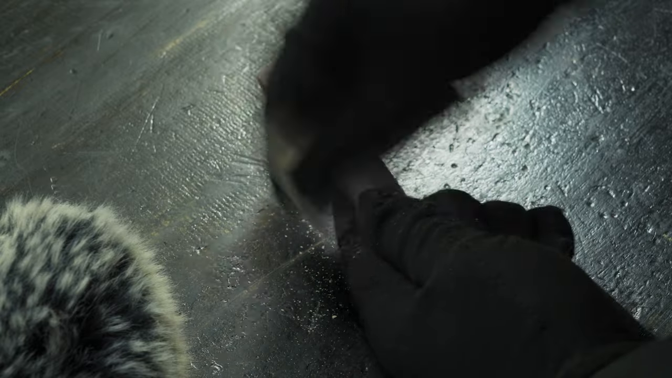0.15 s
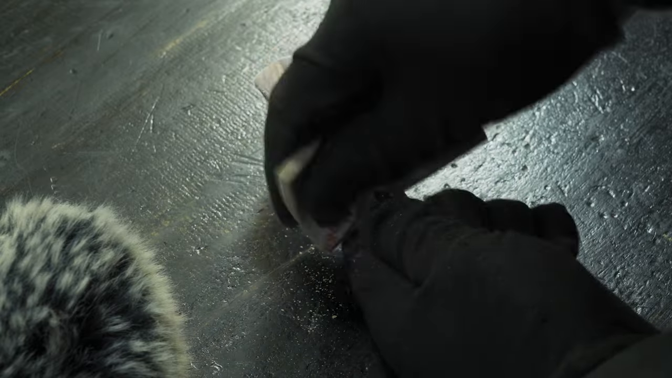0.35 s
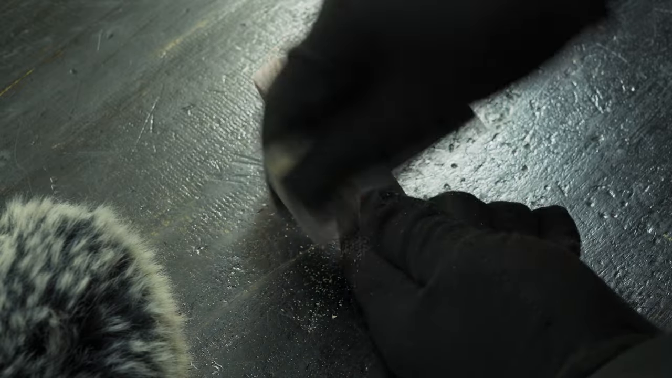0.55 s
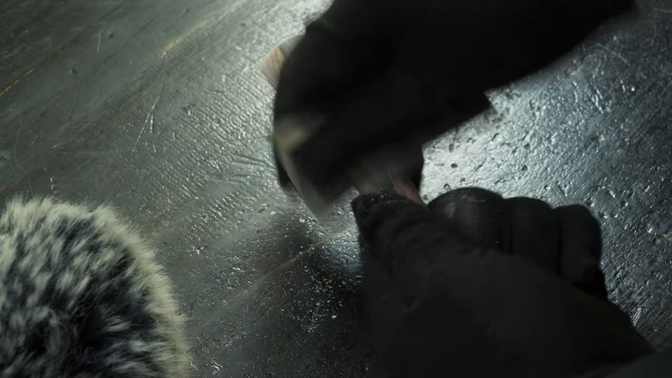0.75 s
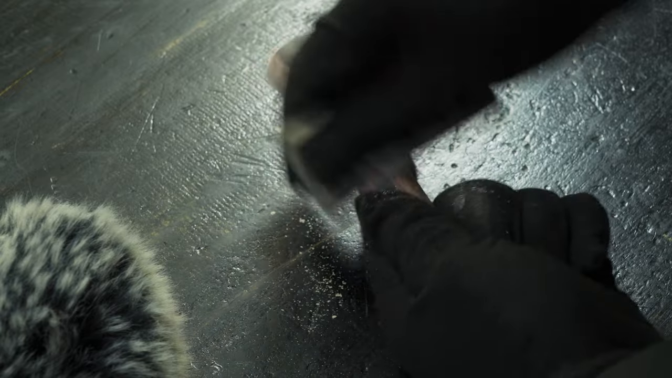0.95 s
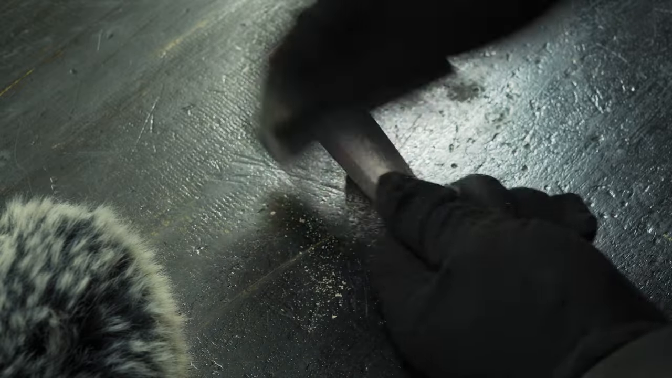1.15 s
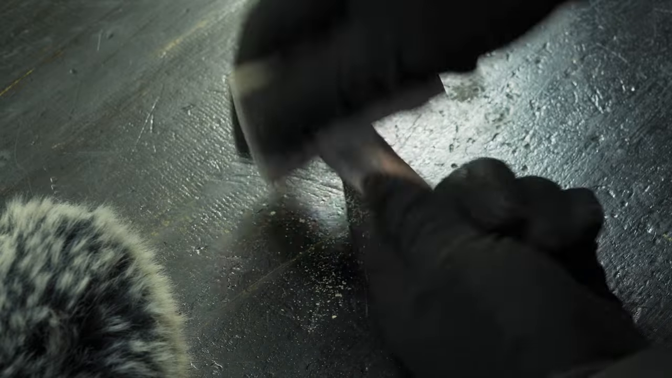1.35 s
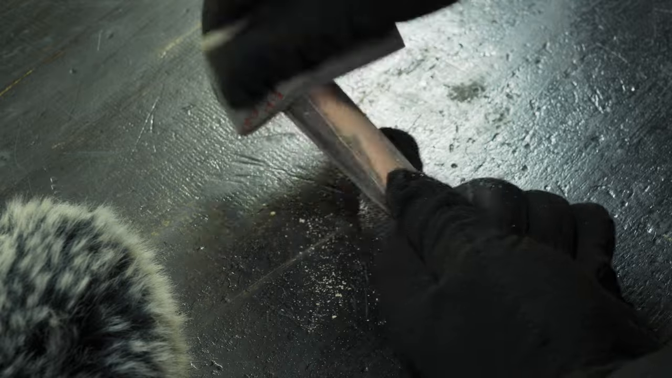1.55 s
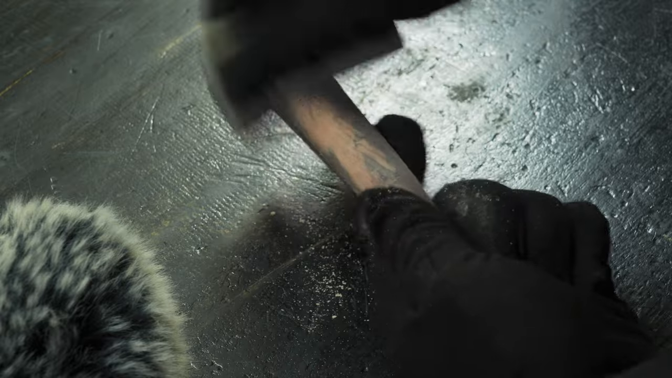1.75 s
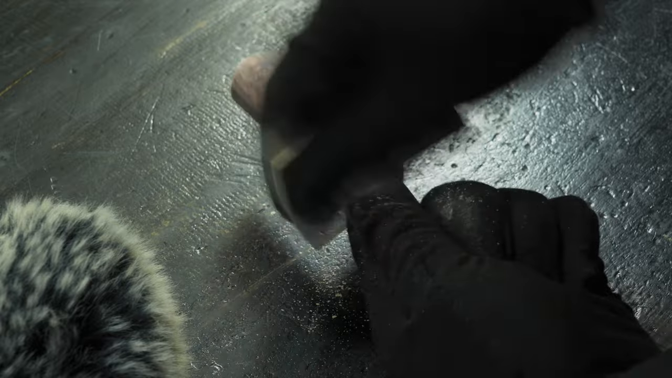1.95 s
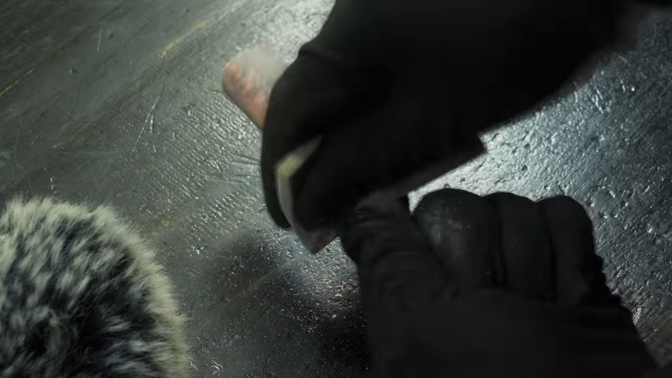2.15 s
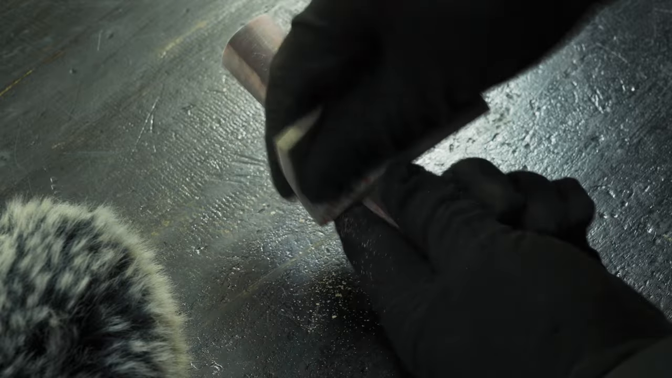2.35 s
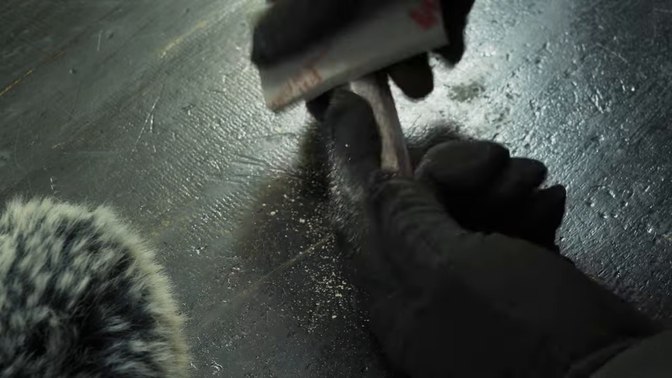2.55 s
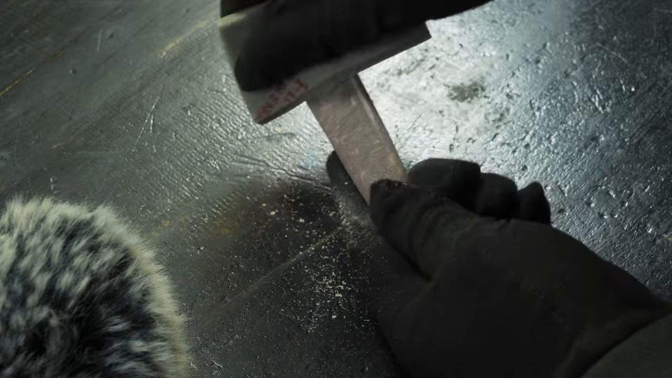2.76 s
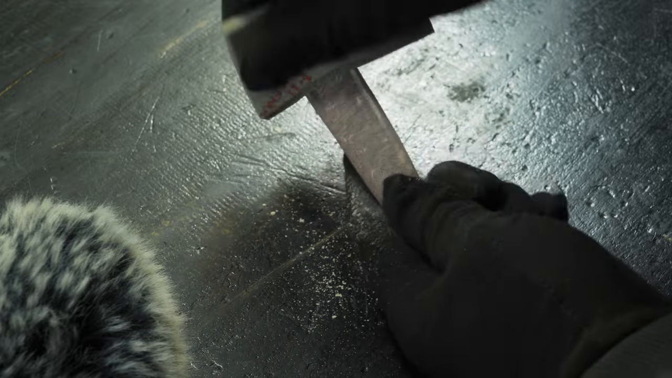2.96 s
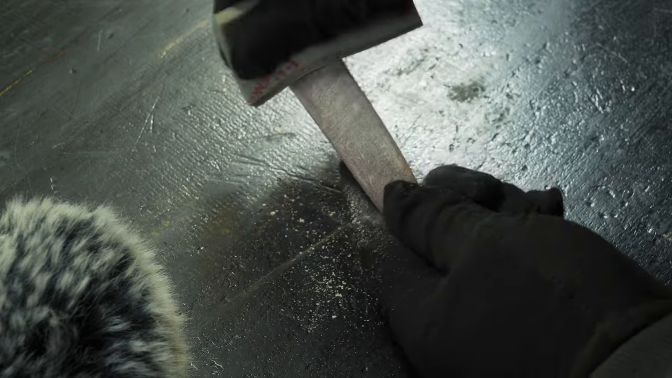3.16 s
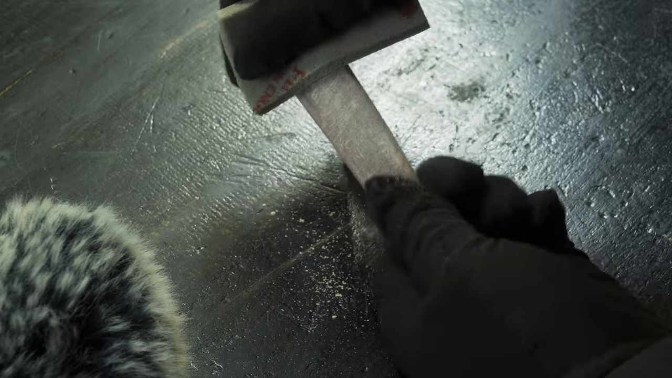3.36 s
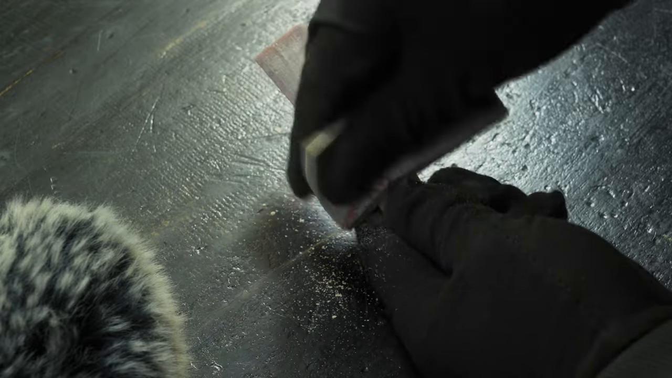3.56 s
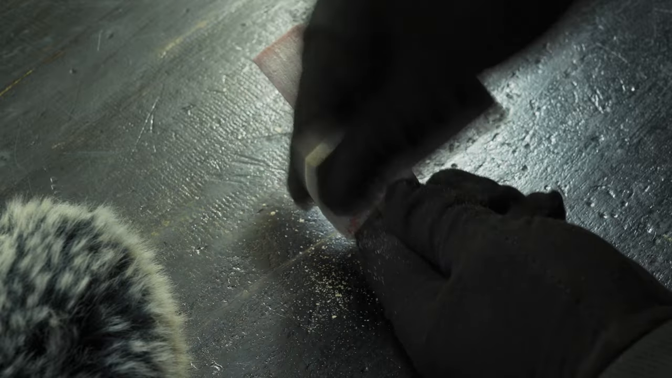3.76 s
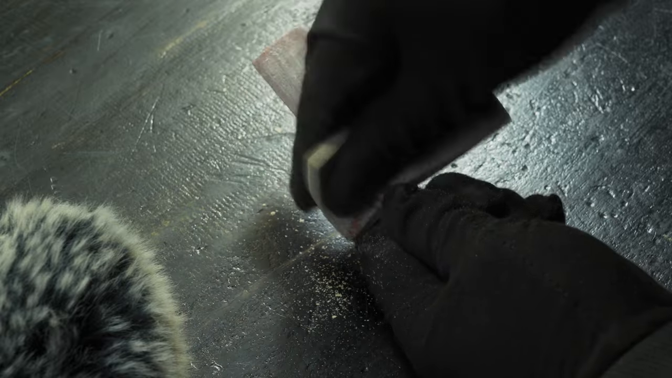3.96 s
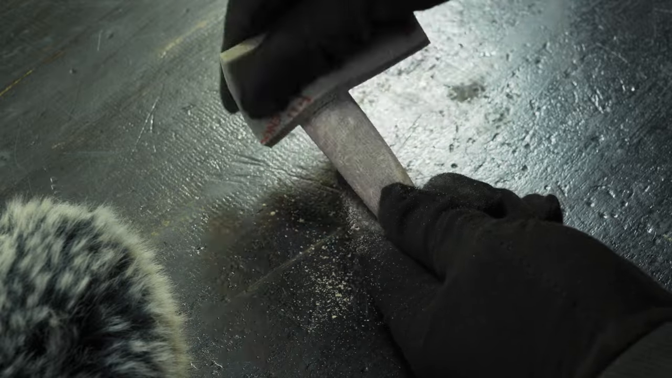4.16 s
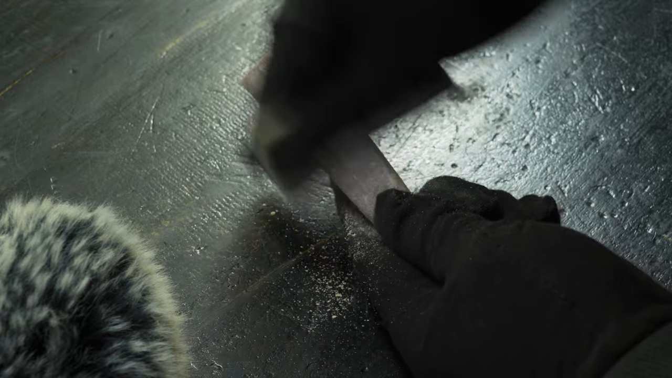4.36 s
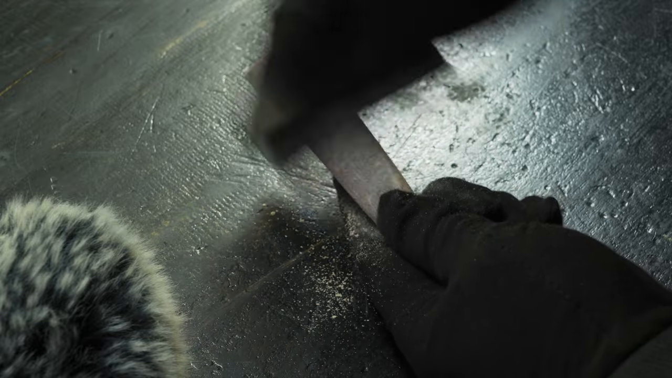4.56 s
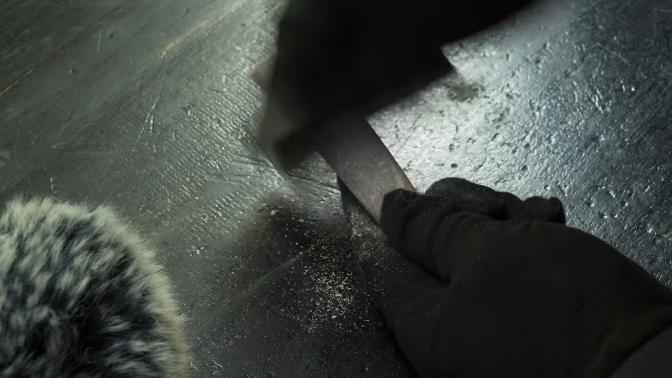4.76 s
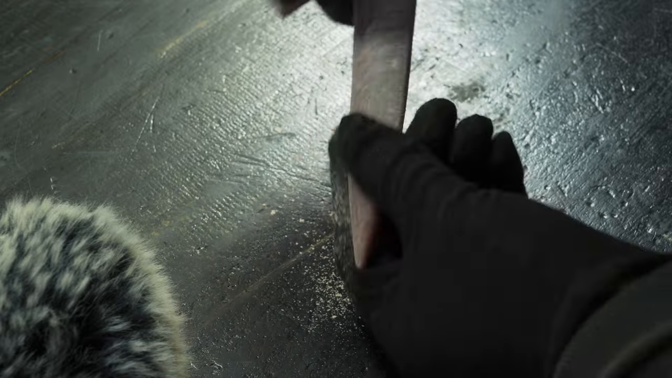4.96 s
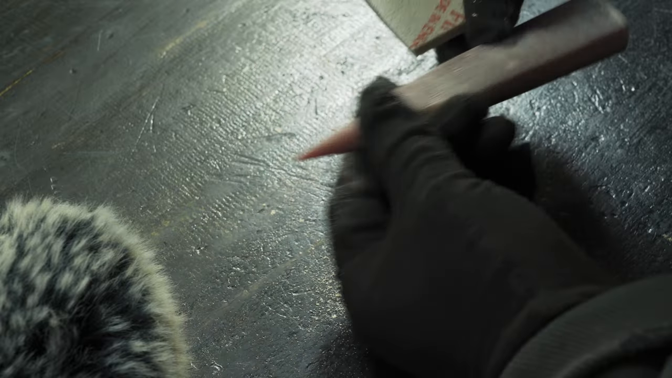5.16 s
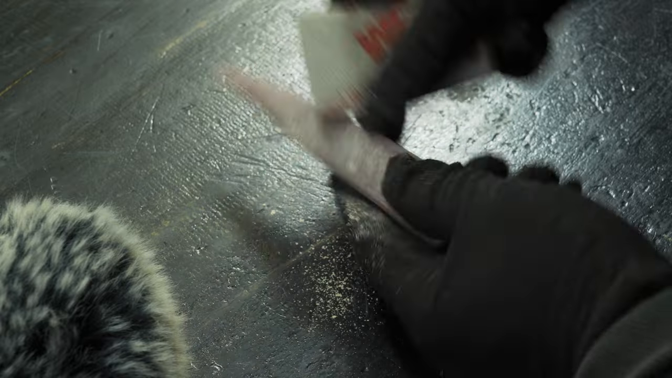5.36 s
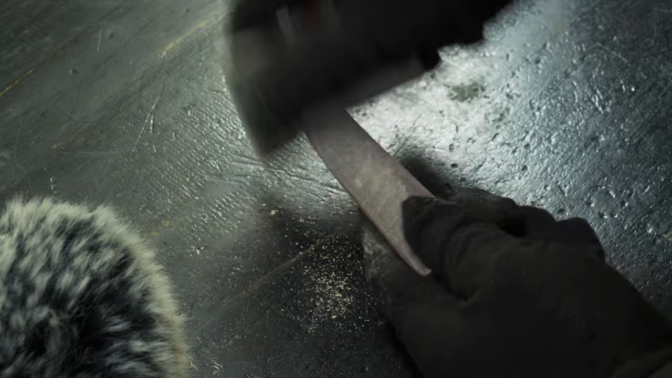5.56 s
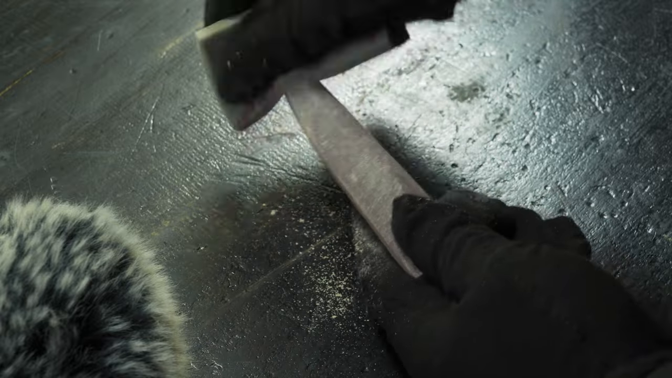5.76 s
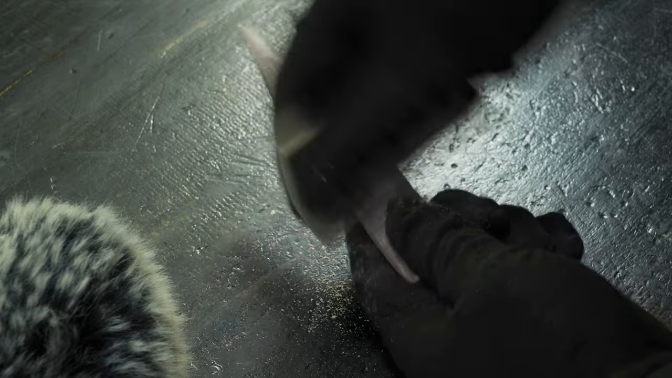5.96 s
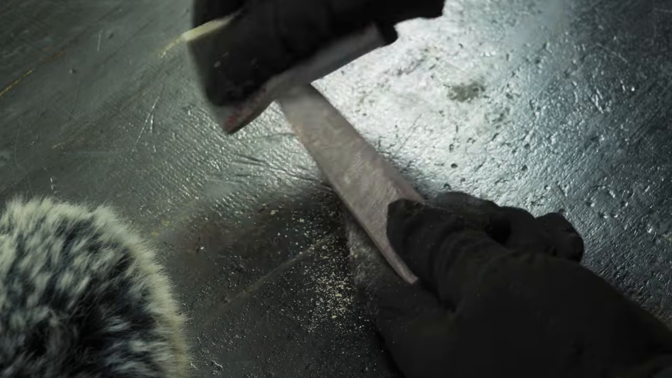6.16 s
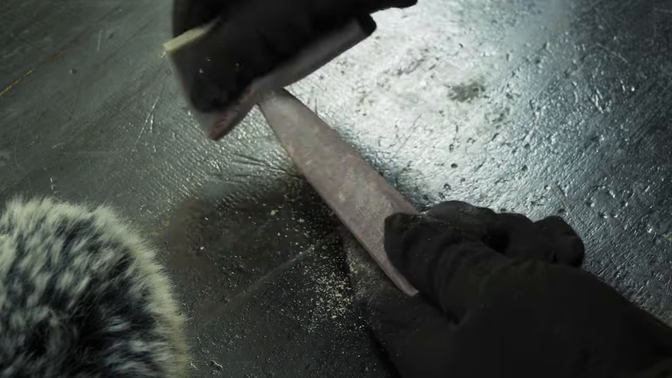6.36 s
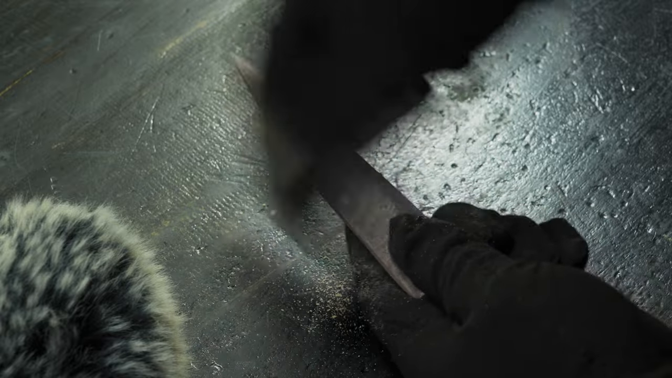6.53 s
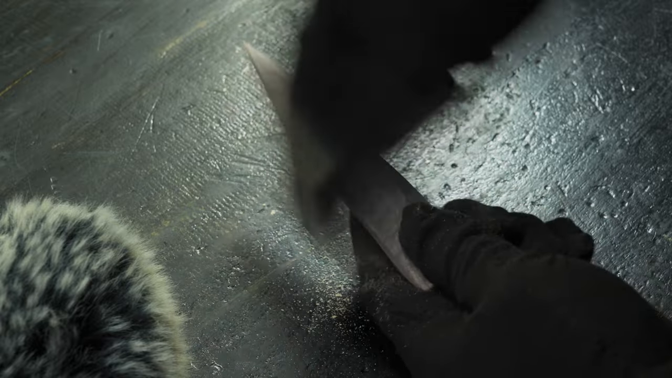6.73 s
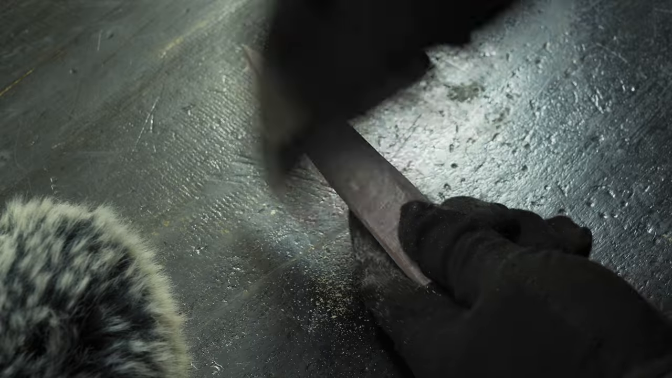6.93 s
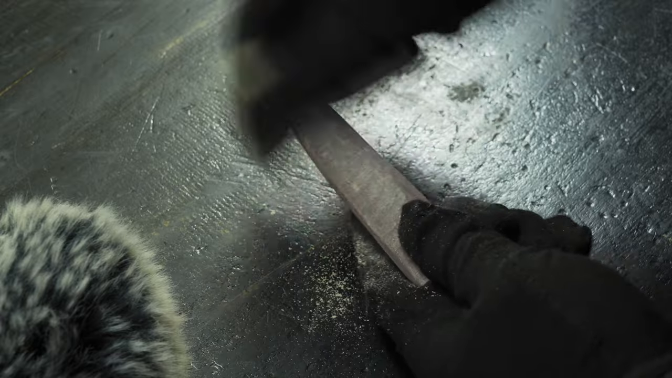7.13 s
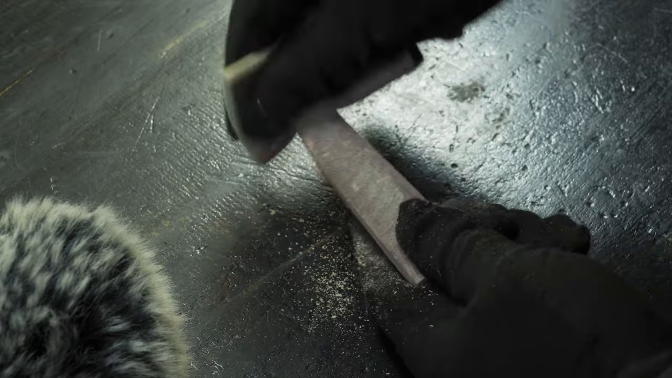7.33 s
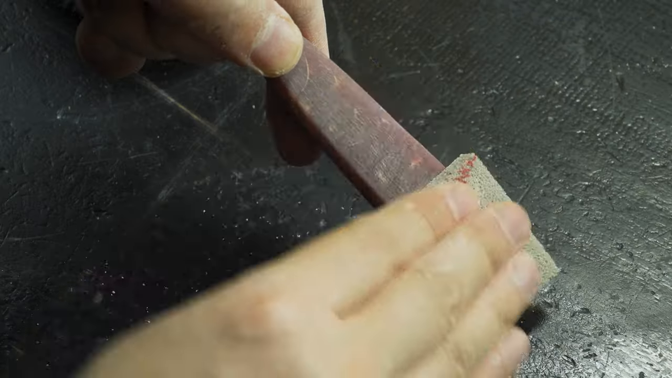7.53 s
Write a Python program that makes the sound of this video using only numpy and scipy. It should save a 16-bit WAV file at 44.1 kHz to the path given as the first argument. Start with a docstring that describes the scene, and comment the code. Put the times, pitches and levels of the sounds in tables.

```python
"""Sanding a stick of dried fish

Close microphone at a table in a small, damped room, with the work off to the right. A sanding pad is
rubbed fast to and fro over a rock-hard stick of dried fish. Each stroke is a burst of grit scratches;
the stick knocks and rings as the pad turns, grit snags, and dull thuds pass through the hand into the
table. Between runs, gloved hands turn the stick over with a rustle, a few ticks and a tap."""
import sys
import numpy as np
from scipy import signal
from scipy.fft import rfft, irfft, next_fast_len
from scipy.io import wavfile
from scipy.ndimage import uniform_filter1d

SR = 44100
rng = np.random.default_rng(int(sys.argv[2]) if len(sys.argv) > 2 else 0)


def put_to_file(sound):
    """Save the sound as 16-bit audio at rate SR, in the file named by the first command-line argument."""
    columns = np.atleast_2d(sound).T  # one column per channel
    safe = np.clip(columns, -1, 1)
    whole_steps = np.round(safe * 32767)
    wavfile.write(sys.argv[1], SR, whole_steps.astype(np.int16))


N = 334719
TIME = np.arange(N) / SR

# Spectrum of the room air: frequency_hz, gain_db
AIR_SPECTRUM = [(28, -6), (55, -20), (120, -15), (150, -6), (230, -11), (420, -2), (800, -2.5), (1020, 2.5),
                (1400, -6.5), (4000, -13.5), (9000, -20.5), (16000, -25)]
# Runs of to-and-fro sanding: start_s, stroke_count, cycle_s, slowing_s (per cycle), startup_lag_s
SANDING_RUNS = [(0.031, 26, .0947, .00034, .0045), (1.56, 8, .094, 0, 0), (2.024, 10, .097, 0, 0),
                (3.067, 6, .095, 0, .009), (3.507, 14, .0995, 0, .014), (4.299, 12, .0978, 0, 0),
                (5.645, 6, .102, 0, .008), (6.026, 4, .102, 0, .001), (6.336, 2, .102, 0, 0),
                (6.507, 21, .0973, .00096, .001)]
# How the pad meets the stick in each run (swell: rise over a stroke, bite: low rasp, sheen: treble):
# level_db, push_swell_db, pull_swell_db, push_bite_db, pull_bite_db, push_sheen_db, pull_sheen_db,
# push_start_knock_db, push_stop_knock_db
PAD_CONTACT = [(-45, 1.5, -8, 0.07, -0.3, -1, 0.7, -68, -57.5),
               (-48, -2, -7.5, 0.7, 0.4, 0.5, 2.5, -67.5, -62),
               (-48, 6, -1, -0.5, -0.5, -1.3, 1, -79, -57.5),
               (-46.5, -1.5, -1, 0, -0.17, -1, 1.2, -66, -50.5), (-46.5, 3, -1, 0.5, 0, 0, 1.5, -53, -53.5),
               (-46.5, 3.5, -0.5, 0.3, -0.3, -2.6, 0.7, -50, -51.5),
               (-43, -1.5, -2.5, 1.35, -1.3, 6, 2.5, -56, -59),
               (-44.5, -0.5, -7, 1, -0.3, 3.5, 1, -51, -70), (-44.5, 4, 5, 0.5, 0, 0.5, 1.5, -59, -61),
               (-45.5, -1, -2.5, -0.98, -2, 3.5, 3.6, -46, -48.5)]
# Hand pressure, on top of each run's level: time_s, gain_db
HAND_PRESSURE = [(0.04, 3), (0.6, -0.96), (0.74, -1), (0.88, -3), (1.02, -5.5), (1.1, -1.5), (1.22, -1),
                 (1.7, -1), (1.85, -5.5), (2.04, -3), (2.21, -3), (2.3, -2.6), (2.48, -3), (3.08, 4.5),
                 (3.33, 2.5), (3.7, 2), (6.4, -0.5), (6.52, 1.5), (6.659, 2.5), (7.3, 1.3)]
# Strokes outside the rhythm: start_s, end_s, direction (push 1, pull -1), level_db, swell_db, bite_db,
# sheen_db
SINGLE_STROKES = [(1.343, 1.358, 1, -54.5, -1, -0.5, -9), (1.423, 1.473, 1, -57.5, 7.5, -1.5, -6),
                  (1.5, 1.539, -1, -49, 7, -1.5, 0.5), (2.504, 2.535, 1, -47, 10.5, 1.5, -5.5),
                  (2.764, 2.783, 1, -53.5, -6, 7, 3.5), (4.868, 4.882, -1, -40, 20, 0, 4)]
# Spectrum of grit on the stick: frequency_hz, gain_db
RASP_SPECTRUM = [(120, -61), (530, -32.5), (900, -29.5), (1320, -29), (2040, -10.5), (3110, -4), (3820, -5),
                 (4800, 0.5), (5550, -4), (6640, -9.5), (7490, -3), (8870, -7), (11600, -0.5), (13200, -5),
                 (15100, -1.5), (16000, -24)]
# Where light strokes sound hollow: frequency_hz, weight
HOLLOW_SHAPE = [(5200, 0.46), (6400, 1.0), (7500, 0)]
# How sheen tilts the rasp: frequency_hz, weight
SHEEN_SHAPE = [(4500, -0.52), (8000, 0.36), (11000, 0.48), (15000, 0.91)]
# Flare of the rasp on a rough patch near the far end of the pad's travel: time_s, flare_db
ROUGH_PATCH = [(0.05, -1), (0.36, 2), (0.66, 9), (0.98, -10.5), (1.16, 7), (1.55, 8), (2.03, -3.5),
               (2.3, 4), (2.5, 6), (3.1, 3.5), (4.05, 2.5), (4.45, 9), (5.7, -6.5), (7.5, 1)]
# How loosely the stick rocks in the hand: time_s, level_db
ROCKING_LEVEL = [(0, -64), (0.6, -65), (0.88, -72.5), (1.2, -64.5), (1.5, -72), (1.85, -67), (2.4, -68),
                 (2.6, -67.5), (3.3, -79), (3.7, -75), (4.2, -71.5), (5.8, -64.5), (6.3, -70), (6.8, -64.5),
                 (7.55, -65)]
# Spectrum of the rumble in hand and table: frequency_hz, gain_db
RUMBLE_SPECTRUM = [(25, 4.5), (55, -6.5), (110, -2), (160, 2), (220, 3.5), (430, -2), (620, 1), (900, -4.5),
                   (1500, -3.5)]
# Modes of the stick: pitch_hz, level_db, t60_s, muting_db (lost under the pad; negative is a gain)
STICK_MODES = [(437, -1.5, 0.084, 2.5), (511, -4.5, 0.17, 25), (590, 0, 0.061, 18), (1080, -19.5, 0.046, 9),
               (1282, -4, 0.066, 34), (1290, -20, .05, 22), (1870, -34, 0.047, -21)]
# Hard knocks of the stick against its rest: time_s, level_db
HARD_KNOCKS = [(0.715, -40), (0.989, -47.5), (1.729, -46), (2.132, -47.5), (2.344, -48.5), (4.436, -44),
               (4.723, -40), (4.821, -35.5), (5.337, -40.5), (5.355, -50.5), (6.803, -39.5), (7.214, -36.5)]
# Grit snagging or a crumb snapping: time_s, level_db, centre_hz
GRIT_SNAGS = [(0.133, -30, 2040), (0.715, -20, 2630), (1.372, -37, 7000), (2.318, -33.5, 2550),
              (2.861, -45, 9000), (4.881, -26.5, 2300), (5.183, -40.5, 6940), (5.197, -35, 2240),
              (5.543, -34, 5900), (5.619, -36, 5630)]
# Thuds through the holding hand into the table: time_s, peak_db, pitch_hz
TABLE_THUDS = [(0.539, -52.5, 210), (0.718, -51, 293), (1.874, -61.5, 210), (2.153, -62, 220),
               (2.219, -56, 221), (2.254, -56, 220), (2.348, -55, 220), (2.429, -54, 216),
               (4.885, -34, 300), (5.185, -45, 305), (5.198, -31, 670)]
# Gloves and pad sliding as the grip changes: start_s, end_s, level_db, tilt_db_per_octave
GLOVE_SLIDES = [(1.277, 1.341, -64.5, 8), (2.541, 2.614, -55.5, 4), (2.608, 2.654, -61.5, 9.5),
                (2.642, 2.713, -75, 0), (2.883, 2.912, -61, 0.5), (2.985, 3.07, -69, 3.5),
                (4.881, 4.962, -57, 4), (5.29, 5.321, -62, -2), (5.413, 5.657, -64.5, 6),
                (5.481, 5.6, -65, 2)]
# Spectrum of the glove rustle: frequency_hz, gain_db
GLOVE_SPECTRUM = [(120, -47), (500, -3), (1300, 1.5), (3000, -2.5), (5000, 1), (6500, -6.5), (11300, -6.5),
                  (16000, -22.5)]


def from_db(db):
    return 10 ** (np.asarray(db) / 20)


def unit_rms(x):
    return x / np.sqrt(np.mean(x ** 2) + 1e-20)


def add(out, time_s, sound):
    """Mix a sound in at a time."""
    at = int(np.clip(round(time_s * SR), 0, N))
    out[at:at + len(sound)] += sound[:N - at]


def at_hz(points, hz):
    """Read a curve on a log-frequency axis."""
    known_hz, values = np.transpose(points)
    return np.interp(np.log(hz + 1), np.log(known_hz), values)


def colour(x, spectrum):
    """Give a sound a spectrum; rms 1."""
    size = next_fast_len(len(x))
    gain = from_db(at_hz(spectrum, np.fft.rfftfreq(size, 1 / SR)))
    return unit_rms(irfft(rfft(x, size) * gain, size)[:len(x)])


def wander(along, step):
    """Random values of spread 1, one every step, joined by lines."""
    return np.interp(along / step, np.arange(4096), rng.standard_normal(4096))


def grit(size, per_s, spread_db):
    """Grains catch at random moments with uneven strength; rms 1."""
    caught = rng.random(size) < per_s / SR
    grains = caught * rng.standard_normal(size)
    return unit_rms(grains * from_db(spread_db * np.minimum(rng.exponential(1, size), 5)))


def ring(drive, hz, t60_s):
    """One mode: a unit click sets off a decaying sine."""
    decay, angle = from_db(-60 / (t60_s * SR)), 2 * np.pi * hz / SR
    return signal.lfilter([0, np.sin(angle)], [1, -2 * decay * np.cos(angle), decay ** 2], drive + 1e-18)


def room_air(level_db=-74):
    """Faint, steady air behind the work."""
    return from_db(level_db) * colour(rng.standard_normal(N), AIR_SPECTRUM)


def sanding_hand(push_s=0.033, turn_s=0.014, pull_s=0.038, jitter_s=0.0005, knock_spread_db=3.5):
    """The hand pushes, turns, pulls and rests; the stick knocks lightly at both ends of each push."""
    strokes, knocks = [], []
    for (begin_s, count, cycle_s, slowing_s, lag_s), contact in zip(SANDING_RUNS, PAD_CONTACT):
        run_db, *tone_db, start_knock_db, stop_knock_db = contact
        for k, chance in enumerate(rng.standard_normal((count, 8))):
            cycle, pulling = divmod(k, 2)
            cycle_start = begin_s + cycle_s * cycle + slowing_s * cycle ** 2 / 2 + lag_s * (cycle > 0)
            wait_s, length_s, direction = (push_s + turn_s, pull_s, -1) if pulling else (0, push_s, 1)
            start, end = cycle_start + wait_s + jitter_s * chance[:2] + [0, length_s]
            pressure_db = np.interp((start + end) / 2, *np.transpose(HAND_PRESSURE))
            level_db = run_db + pressure_db + 0.52 * chance[2]
            swell_db, bite_db, sheen_db = tone_db[pulling::2]
            swell_db += 1.5 * chance[3]
            bite_db += 0.45 * pressure_db + 0.57 * chance[4]   # harder pressure bites deeper
            sheen_db += 1.57 * chance[5]
            if k == 0:   # the first push is lighter and duller
                level_db -= 0.5
                sheen_db -= 2.5
            strokes.append((start, end, direction, level_db, swell_db, bite_db, sheen_db))
            if not pulling:
                knocks.append((start, start_knock_db + knock_spread_db * chance[6]))
                knocks.append((end, stop_knock_db + knock_spread_db * chance[7]))
    return strokes, knocks


def scratch_spectrum(size, heavier_db, ripple_db=2.0):
    """Grit scratches of one stroke: each contact favours other resonances; light ones sound hollow."""
    hz = np.fft.rfftfreq(size, 1 / SR)
    gain = from_db(at_hz(RASP_SPECTRUM, hz) + ripple_db * wander(hz, step=180))
    gain *= from_db(0.86 * heavier_db * at_hz(HOLLOW_SHAPE, hz))
    middle = (hz > 3500) & (hz < 9000)
    gain /= np.sqrt(np.mean(gain ** 2 * middle))
    return rfft(grit(size, per_s=30000, spread_db=-1.4)) * gain


def low_cut_db(hz, edge_hz):
    """The steep lower edge of the rasp."""
    return -10 * np.log10(1 + (edge_hz / hz) ** 8)


def stroke_tone_db(stroke, progress, hz, edge_hz=2300, travel_octaves=0.51, arch_octaves=0.095):
    """The rasp changes colour as the pad travels; progress runs from -0.5 to 0.5."""
    start, _, direction, _, swell_db, bite_db, sheen_db = stroke
    position = direction * progress
    speed = 0.5 - (2 * progress) ** 2
    # the lower edge climbs toward the holding hand, arches with speed and drops as the grit bites
    edge_octaves = travel_octaves * position + arch_octaves * speed - 0.28 * bite_db
    edge_db = low_cut_db(hz, edge_hz * 2 ** edge_octaves) - low_cut_db(hz, edge_hz)
    # brightest where the pad presses hardest, dullest where it slows to turn
    treble = at_hz(SHEEN_SHAPE, hz)
    bright_db = sheen_db + 0.93 * swell_db * progress - 3.5 * (2 * progress) ** 4 + 0.5
    # a push ends on the rough patch and a pull starts on it
    on_patch = np.exp(-((position - 0.315) / 0.12) ** 2)
    flare_db = on_patch * np.interp(start, *np.transpose(ROUGH_PATCH))
    return edge_db + treble * bright_db + (1 + treble) / 2 * flare_db


def sanding(strokes, grab_s=0.0009, release_s=0.001, land_s=0.0014, lift_s=0.0032, rough_db=0.75):
    """The pad drags grit over the stick; returns the rasp and the drag force behind it."""
    rasp, drag = np.zeros(N), np.zeros(N)
    size, lead_s, pause_s = 4096, 0.012, 0.04
    hz, t = np.fft.rfftfreq(size, 1 / SR), np.arange(size) / SR - lead_s
    centres_hz = np.geomspace(1400, 14000, 10)
    bands = np.array([np.interp(hz, centres_hz, row) for row in np.eye(len(centres_hz))])
    starts, ends, _, levels_db, *_ = np.transpose(strokes)
    pause_before = np.r_[True, starts[1:] - ends[:-1] > pause_s, True]
    for k, stroke in enumerate(strokes):
        start, end, _, level_db, swell_db, *_ = stroke
        length_s = end - start
        progress = np.clip(t / length_s, 0, 1) - 0.5
        scratch_bands = irfft(scratch_spectrum(size, level_db - np.median(levels_db)) * bands)
        tone_db = stroke_tone_db(stroke, progress, centres_hz[:, None])
        scratches = np.sum(scratch_bands * from_db(tone_db), axis=0)
        # the pad lands and lifts more softly than the grit grabs and lets go at a turn
        onset_s = land_s if pause_before[k] else grab_s
        fade_s = lift_s if pause_before[k + 1] else release_s
        moving = (1 + np.tanh(t / (2 * onset_s))) * (1 + np.tanh((length_s - t) / (2 * fade_s)))
        force = moving * from_db(1.02 * swell_db * progress + rough_db * wander(t + lead_s, 0.002517))
        force *= from_db(level_db) / np.sqrt(np.sum(force ** 2) / (length_s * SR))
        add(rasp, start - lead_s, scratches * force)
        add(drag, start - lead_s, force)
    return rasp, drag


def stick_rocking(drag, bump_spread_db=7, tight_db=-35, loose_db=-29, regrip_s=3.1):
    """Under the pad the stick rocks in the hand in small bumps, and its lowest mode is stirred."""
    force = np.sqrt(np.abs(uniform_filter1d(drag ** 2, size=900)))
    working = uniform_filter1d(1.0 * (force > 2e-4), size=700)
    rocking_db = np.interp(TIME, *np.transpose(ROCKING_LEVEL)) + 3
    bumps = rng.standard_normal(N) * from_db(bump_spread_db * np.minimum(wander(TIME, 0.011), 1.8))
    rumble = working * colour(bumps, RUMBLE_SPECTRUM) * from_db(rocking_db)
    # after the change of grip the stick is held more loosely and rings more
    hum_db = np.where(TIME < regrip_s, tight_db, loose_db) + 3 * wander(TIME, 0.09)
    pitch_hz, _, t60_s, _ = STICK_MODES[0]
    hum = unit_rms(ring(rng.standard_normal(N), pitch_hz, t60_s))
    return rumble + force * from_db(hum_db) * hum


def stick_knocks(knocks, drag, gain_db=-2.0, grip_detune=0.028, spread_db=0.5):
    """Each knock rings all the modes; with the pad on, they shift a little and most are muted."""
    out, t = np.zeros(N), np.arange(6000) / SR
    mode_hz, mode_db, t60_s, muting_db = np.transpose(STICK_MODES)[:, :, None]
    pad_on = uniform_filter1d(drag, size=4000) > 1e-4
    for time_s, knock_db in knocks:
        chance = rng.standard_normal((len(STICK_MODES) + 1, 1))
        held = pad_on[int(np.clip(time_s * SR, 0, N - 1))]
        level_db = knock_db + gain_db + mode_db - muting_db * held - spread_db * chance[1:]
        pitch_hz = mode_hz * (1 + grip_detune * held * chance[0])
        modes = from_db(level_db - 60 * t / t60_s) * np.sin(2 * np.pi * pitch_hz * t)
        add(out, time_s, modes.sum(axis=0))
    # so thin a stick radiates no bass, and the cushioned contact no treble
    return signal.sosfilt(signal.butter(2, [280, 1900], "band", fs=SR, output="sos"), out)


def grit_snags(gain_db=-2.0):
    """A clump of grains lets go within milliseconds; deep snags last longer than bright snaps."""
    out, t = np.zeros(N), np.arange(512) / SR
    for time_s, level_db, hz in GRIT_SNAGS:
        band = signal.butter(2, [hz / 2, min(hz * 2, 0.45 * SR)], "band", fs=SR, output="sos")
        swell = t * np.exp(-t * hz / 1.6)
        crack = signal.sosfilt(band, rng.standard_normal(len(t)) * swell)
        add(out, time_s, crack / np.abs(crack).max() * from_db(level_db + gain_db))
    return out


def table_thuds(swell_cycles=0.35):
    """Dead blows through the hand into the table swell and die within a couple of cycles."""
    out, t = np.zeros(N), np.arange(2048) / SR
    for time_s, peak_db, hz in TABLE_THUDS:
        motion = t * np.exp(-t * hz / swell_cycles) * np.sin(2 * np.pi * hz * t)
        pressure = np.diff(motion)
        add(out, time_s, from_db(peak_db) * pressure / np.abs(pressure).max())
    return out


def glove_rustle(patchy_db=3.0, crackle_db=-83):
    """Light sliding contact: a soft swell of fine grains, with lone crumbs crackling around it."""
    rustle = np.zeros(N)
    for start, end, level_db, tilt_db in GLOVE_SLIDES:
        t = np.arange(int((end - start) * SR)) / SR
        spectrum = [(hz, db + tilt_db * np.log2(hz)) for hz, db in GLOVE_SPECTRUM]
        swell = signal.windows.tukey(len(t), 0.5) * from_db(level_db + patchy_db * wander(t, 0.00512))
        add(rustle, start, swell * colour(grit(len(t), per_s=27000, spread_db=5.0), spectrum))
    handling = np.clip(4 * uniform_filter1d(1.0 * (rustle != 0), size=SR // 2), 0, 1)
    crumbs = colour(grit(N, per_s=31, spread_db=-3.0), GLOVE_SPECTRUM)
    return rustle + from_db(crackle_db) * handling * crumbs


def room_tail(direct, t60_s=0.054, wet_db=-17.5, first_echo_s=0.0047, dull_hz=9000):
    """The small, damped room sends a short, slightly dull tail back to the microphone."""
    t = np.arange(SR // 3) / SR
    build_up = np.clip(t / first_echo_s - 1, 0, 1)
    tail = rng.standard_normal(len(t)) * from_db(-60 * t / t60_s) * build_up
    tail = signal.sosfilt(signal.butter(1, dull_hz, fs=SR, output="sos"), tail)
    return from_db(wet_db) * signal.fftconvolve(direct, tail / np.linalg.norm(tail))[:N]


def scene(left_minus_right_db=-9.5):
    """Everything reaches the microphone from one point, close and to the right."""
    strokes, light_knocks = sanding_hand()
    rasp, drag = sanding(sorted(strokes + list(SINGLE_STROKES)))
    stick = stick_rocking(drag) + stick_knocks(light_knocks + list(HARD_KNOCKS), drag)
    direct = rasp + stick + grit_snags() + table_thuds() + glove_rustle()
    mono = direct + room_tail(direct) + room_air()
    sides = from_db([[left_minus_right_db], [0]])
    return mono * sides / sides.mean()


def record(dry, cutoff_hz=15950):
    """A steep low-pass after the microphone takes off the very top."""
    return signal.sosfilt(signal.ellip(12, 0.1, 80, cutoff_hz, fs=SR, output="sos"), dry)


dry = scene()
out = record(dry)
put_to_file(out)
```